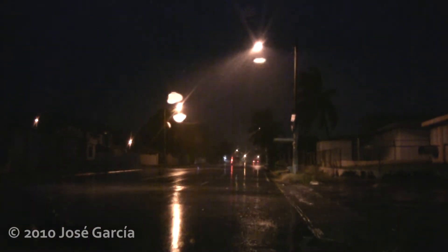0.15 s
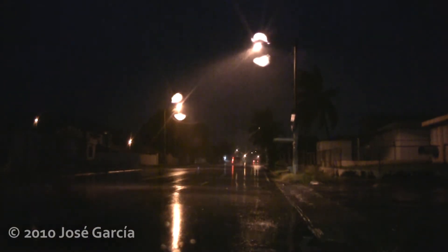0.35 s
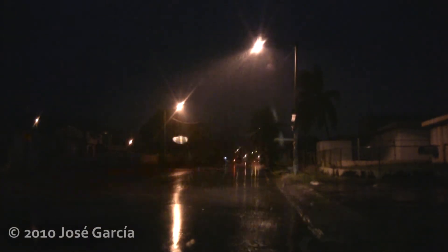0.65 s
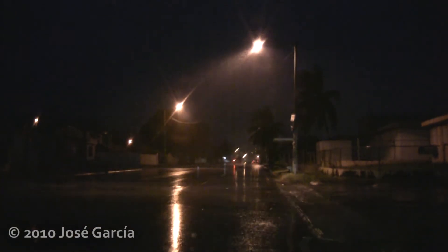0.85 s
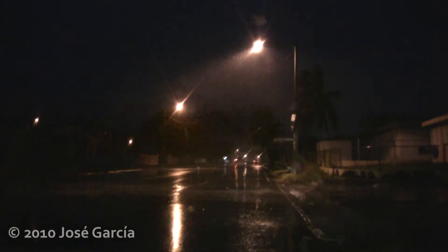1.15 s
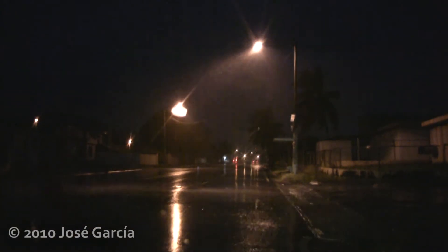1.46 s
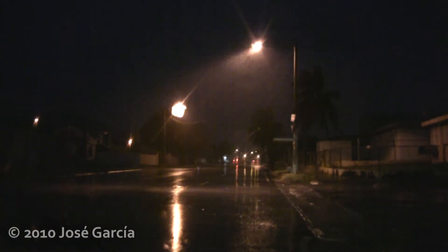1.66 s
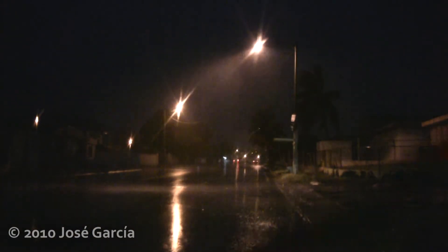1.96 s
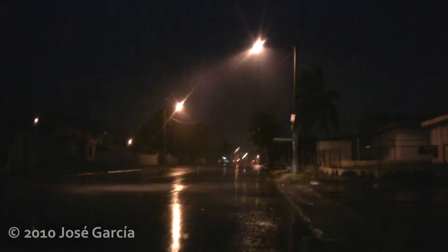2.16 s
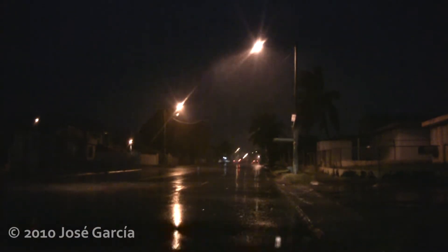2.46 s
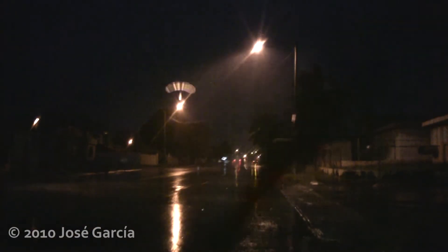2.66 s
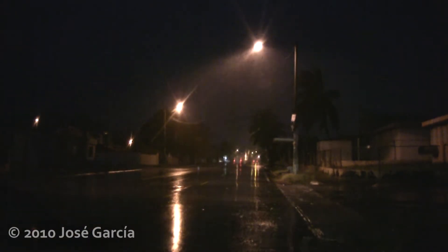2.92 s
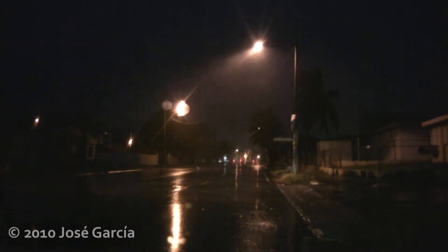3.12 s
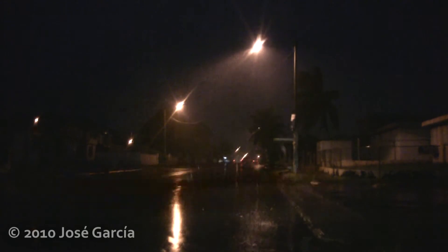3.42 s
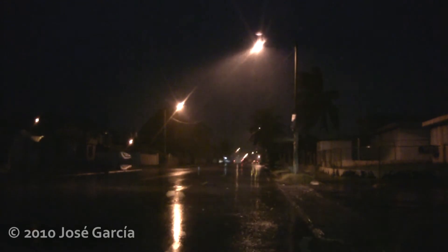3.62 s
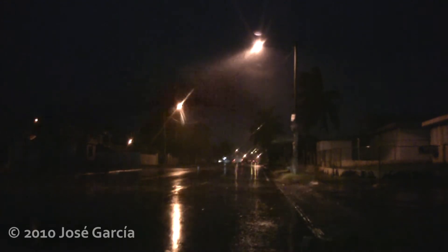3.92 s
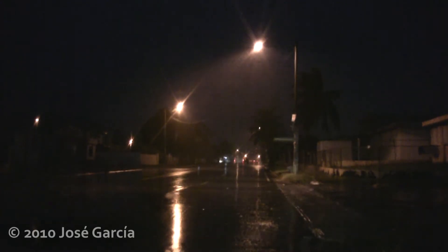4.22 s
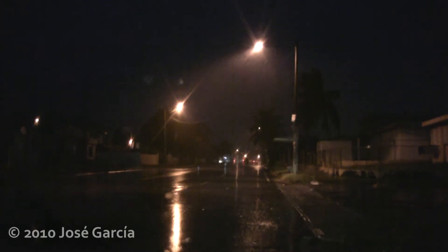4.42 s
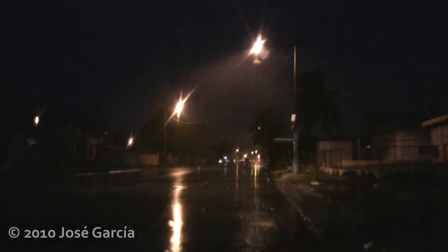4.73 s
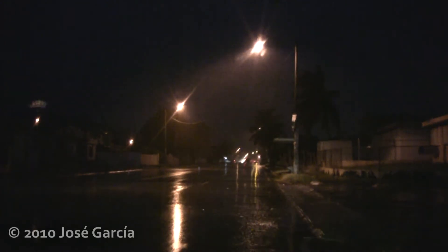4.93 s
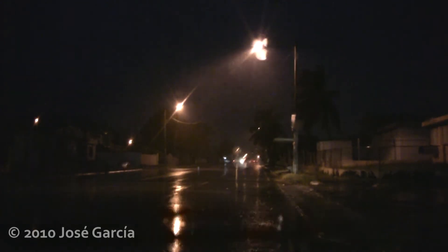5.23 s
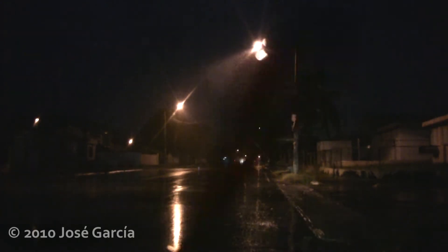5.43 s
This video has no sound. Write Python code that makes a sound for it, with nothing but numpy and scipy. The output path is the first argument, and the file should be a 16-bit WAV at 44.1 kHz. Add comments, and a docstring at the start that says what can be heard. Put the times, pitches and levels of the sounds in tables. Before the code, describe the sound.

Close stereo sound from a dashboard: a throbbing idle and low roof rain lie under wiper slaps every 0.7 seconds, alternating booming and lighter. After the first slaps, plastic catches rattle, the washer motor whirs and water sprays and pounds on the windscreen, then the stalk clacks back. Scattered splats and dry ticks continue, with rain slightly stronger later. Small, dry cabin; the loudest impacts distort.

```python
"""Wipers and rain inside a parked car

Stereo microphone on the dashboard, a little nearer its left port; input peaks above full scale clip.
Two wiper blades slap at each end of a fast sweep: damped modes of glass and cowl under noise cracks.
Behind them an idling engine sums wavering orders and firing knocks; rain is noise shaped by random drops.
Splats and dry ticks on the body are decaying noise bursts.
The washer stalk clacks, its pump hums in harmonics, its water hisses.
"""
import sys
import numpy as np
from scipy import signal
from scipy.fft import rfft, irfft, next_fast_len
from scipy.io import wavfile
from scipy.ndimage import map_coordinates

SR = 44100
rng = np.random.default_rng(int(sys.argv[2]) if len(sys.argv) > 2 else 0)


def master(y):
    """Save y as 16-bit WAV."""
    cut = np.clip(np.atleast_2d(y).T, -1, 1)
    pcm = np.round(cut * 32767)  # scale
    wavfile.write(sys.argv[1], SR, pcm.astype(np.int16))


def to_linear_factor(level_db):
    """Convert decibel levels (scalar or array-like) to linear amplitude factors."""
    exponent = np.asarray(level_db, float) / 20
    return 10 ** exponent


N = 246078

# How hard it rains. Each row: time in seconds, strength in dB.
RAIN_STRENGTH = [(0.0, -47), (.8, -45), (1.1, -44), (1.48, -44.5), (2.0, -39.5), (2.36, -41.5),
                 (2.75, -40.5), (3.25, -43.5), (3.56, -38.5), (3.8, -43.5), (4.1, -41.5), (4.6, -38.5),
                 (5.14, -41), (5.58, -39.5)]
# Spectrum of drops on the roof. Each row: frequency in Hz, relative level in dB per Hz.
ROOF_SPECTRUM = [(32, -40), (55, -4), (102, -5.5), (134, 1), (293, -6), (390, -11.5), (438, -5), (484, -14),
                 (544, -9), (654, -17), (899, -17.5), (1260, -25), (3000, -38.5), (3900, -51), (6600, -120)]
# Spectrum of fine spray on the glass. Each row: frequency in Hz, relative level in dB per Hz.
SPRAY_SPECTRUM = [(710, -18), (1200, -3), (1840, -4.5), (2010, -2.5), (4410, -5), (5360, -10.5),
                  (9410, -13.5), (10900, -18.5), (12200, -22.5), (15900, -51), (22000, -120)]
# Spectrum of washer water on the glass. Each row: frequency in Hz, relative level in dB per Hz.
WATER_SPECTRUM = [(880, -27), (1500, -11), (2170, -11), (2770, -4), (3140, -5), (3360, -7), (6280, -8),
                  (12200, -16.5), (15900, -47), (22000, -120)]
# Likeness of the rain at the left and right ports. Each row: frequency in Hz, correlation from 0 to 1.
PORT_LIKENESS = [(60, .98), (500, .93), (2000, .82), (4000, .5), (8000, .35), (12000, .35)]
# Spurts of hiss on the glass: washer water, and a brief hiss with the slap at 1.70 s. Each row: start of full
# strength in seconds, seconds per 20 dB of rise, hold in seconds, seconds per 20 dB of fall, hiss level in dB.
WATER_SPURTS = [(1.593, 0.011, 0.0086, 0.13, -34), (1.695, 0.058, .006, .015, -35),
                (1.848, 0.55, 0.28, .08, -34), (2.253, 0.017, 0.057, 0.017, -33)]
# Engine idle. Each row: time in seconds, firing rate in Hz.
IDLE_RATE = [(0, 21.6), (1.7, 21.6), (1.9, 21.46), (3.3, 21.47), (3.6, 21.53), (5.0, 21.52), (5.58, 21.42)]
# Engine orders. Each row: multiple of the firing rate, relative level in dB.
ENGINE_ORDERS = [(1, 3), (2, -0.5), (3, -30), (4, -13), (4.5, -2), (6, 3.5), (8, -40), (9, -9), (10, -0.5),
                 (11, -14), (12, -7)]
# Body resonances struck by each firing. Each row: frequency in Hz, width in Hz, relative level in dB.
FIRING_RESONANCES = [(367, 19.5, 5.5), (451, 54, 2), (571, 34, 3), (770, 66, -9.5), (924, 26, 2)]
# Faint narrow bands of steady noise near 10.4 to 11 kHz. Each row: frequency in Hz, width in Hz,
# relative level in dB.
NARROW_HISS_BANDS = [(10400, 40, 6), (10790, 37, 8), (11040, 47, 10)]
# Washer pump harmonics. Each row: multiple of the pump speed, rms level in dB.
PUMP_HARMONICS = [(1, -29), (2, -29.5), (3, -32.5), (4, -30), (5, -36), (6, -46.5), (7, -41)]
# Splats and dry ticks on the body. Each row: start in seconds, thump in dB, burst in dB, fine hiss in dB.
BODY_HITS = [(0.093, -29, -30, -56), (0.436, -27, -27, -41), (1.008, -12, -39, -51),
             (1.1778, -24, -23.5, -34), (1.219, -12.5, -46, -56), (1.2368, -10, -21.5, -27),
             (2.005, -15, -38, -39), (2.235, -11, -42, -47), (2.281, -10.5, -28, -39),
             (2.582, -16, -31, -51), (2.8608, -14, -26.5, -49), (3.94, -33, -23, -68),
             (4.3521, -14.5, -17, -49), (5.05, -26, -47, -31), (5.092, -28, -43, -33),
             (5.3526, -20, -19.5, -29), (5.448, -15.5, -51, -50)]
# Body panels under a hit. Each row: frequency in Hz, width in Hz, relative level in dB.
PANEL_RESONANCES = [(312, 81, 10.5), (540, 175, 8), (856, 220, 4), (1360, 116, -2.5), (1810, 440, -13.5)]
# The washer stalk is pulled, then let go. Each row: start in seconds, thump in dB, clack in dB,
# rattle in dB, pitch of the hollow knock in Hz.
STALK_HITS = [(1.414, -6.5, -23, -27, 513), (1.4331, -4.5, -14, -19.5, 932), (1.467, -11.5, -27, -39, 598),
              (1.482, -3.5, -21, -40, 1270), (1.5078, -12, -46, -41, 300), (1.522, -12.5, -19.5, -29, 590),
              (2.106, -9, -24, -31, 872), (2.15, -10.5, -35, -39, 566), (2.1748, -3.5, -31, -39, 798)]
# Decay of the cabin. Each row: frequency in Hz, t60 in seconds.
CABIN_DECAY = [(150, 0.061), (1000, 0.033), (8000, 0.04)]
# Slaps at the low end of the sweep. Each row: start in seconds, knock in dB, crack in dB,
# lead-in tick in seconds before, rebound in seconds after.
LOW_SLAPS = [(0.3288, 3, -17.5, 0.011, 0.023), (1.7004, 2, -14.5, .0156, .024),
             (3.0797, 2.5, -19, 0.011, .0302), (4.455, 1, -14, 0.013, .0165)]
# Slaps at the high end of the sweep. Each row: start in seconds, knock in dB, crack in dB,
# second tap in seconds before, first tap in seconds before.
HIGH_SLAPS = [(1.033, -8, -26, .0185, 0.04), (2.4068, -4.5, -21.5, .0218, .0423),
              (3.7832, -2.5, -21, .0123, .0295), (5.158, -2.5, -21.5, .0215, 0.036)]
# Glass and cowl at the low end. Each row: frequency in Hz, relative level in dB, t60 before damping in seconds.
LOW_MODES = [(142.7, -5.5, 0.12), (188.6, 3, 0.16), (283, -3, 0.3), (331, -0.5, 0.12), (434, -11, 0.17),
             (651, -7, 0.036)]
# Glass and cowl at the high end. Each row: frequency in Hz, relative level in dB, t60 before damping in seconds.
HIGH_MODES = [(139, 5, 0.069), (169, 3, .13), (231.6, 4, 0.076), (365.7, 5, 0.073), (511, -5.5, 0.079),
              (757, -0.5, 0.052), (936, -3.5, 0.054)]
# Linkage taking up slack. Each row: frequency in Hz, relative level in dB, t60 before damping in seconds.
SLACK_MODES = [(210.4, 8.5, 0.055), (428, 6, 0.031), (643, -1.5, 0.083), (764, -3, 0.07)]
# Metal frame of the blade. Each row: frequency in Hz, relative level in dB, t60 in seconds.
FRAME_MODES = [(1392, 3.5, 0.058), (1806, 11.5, 0.018), (1840, -18, 0.01), (2690, -4, 0.078),
               (3450, -28, 0.012)]
# The two microphone ports. Each row: frequency in Hz, phase lead of the left in radians.
PORT_PHASE = [(20, 0), (2000, .05), (4500, .7), (8000, 1.5), (11000, 2.0)]

ROOF_DB, ROOF_SWING, SPRAY_OVER_DB = -21.5, 0.29, 1.33  # at mean strength; dB per dB; over the strength
STRAIN_DB, STRAIN_S = 4.5, 0.07  # the body booms more while the blades turn round
POUND_DB = 4.5  # washer water also drums on the glass, over its hiss
PUMP_ON_S, PUMP_OFF_S, PUMP_RAMP_S, PUMP_HZ = 1.56, 2.12, 0.03, 126
HIT_T60_S, LONGER_PER_DB = 0.086, 0.06  # at a thump of 0 dB; heavier lasts longer
HOLLOW_DB, HOLLOW_T60_S, COLUMN_HZ, COLUMN_DB = -2, 0.071, 162, -5  # levels relative to the thump
# (knock, crack) relative to the slap, in dB
LEAD_DB, REBOUND_DB, SETTLE_DB = (-18, -6.5), (-10, -7.5), (-15.5, -45)
SECOND_TAP_DB, FIRST_TAP_DB = (-11, 3), (-13.5, -6)
SETTLE_S = 0.02  # after the rebound
LOW_SLACK, HIGH_SLACK = (0.098, -17, -61), (0.1275, -14, -39)  # (s ahead of the slap, knock dB, crack dB)


def unit(x):
    """Scales a signal to rms 1."""
    return x / np.sqrt(np.mean(x ** 2) + 1e-20)


def along(points, hz):
    """Interpolates (Hz, value) points on a log frequency axis."""
    f, v = np.transpose(points)
    return np.interp(np.log(hz + 1), np.log(f + 1), v)


def curve(rows):
    """Interpolates (seconds, value) rows to one value per sample."""
    s, value = np.transpose(rows)
    return np.interp(np.arange(N) / SR, s, value)


def wobble(rate):
    """A smooth random curve with rate knots a second."""
    knots = rng.standard_normal(int(N * rate / SR) + 4)
    return map_coordinates(knots, [np.arange(N) * rate / SR])


def filtered(x, response):
    """Multiplies the spectrum of x by a complex response of frequency."""
    m = next_fast_len(N + SR // 2)
    return irfft(rfft(x, m) * response(np.fft.rfftfreq(m, 1 / SR)), m)[..., :N]


def resonances(peaks):
    """Causal response of parallel (Hz, width, dB) resonances of alternating sign."""
    def response(f):
        total = 0
        for k, (centre, width, db) in enumerate(peaks):
            damping = 1j * f * width
            total = total + (-1) ** k * to_linear_factor(db) * damping / (centre * centre - f * f + damping)
        return total
    return response


def band(lo_hz, hi_hz):
    """A causal band-pass."""
    sos = signal.butter(3, [lo_hz, hi_hz], "bandpass", fs=SR, output="sos")
    return lambda x: signal.sosfilt(sos, x)


def ring(modes, t):
    """Decaying modes, their strengths scattered anew for each blow."""
    scatter_db = 1.2
    return sum(to_linear_factor(db + rng.normal(0, scatter_db) - 60 * t / t60) * np.sin(2 * np.pi * hz * t)
               for hz, db, t60 in modes)


def burst(times, level_db, t60, rise_s, colour):
    """Coloured noise under a sharp rise and a decay; its energy follows from level and decay."""
    out, t = np.zeros(N + SR), np.arange(SR // 4) / SR
    for s, db, fall in zip(times, level_db, np.broadcast_to(t60, len(times))):
        shape = to_linear_factor(-60 * t / fall) * (1 - np.exp(-t / rise_s))
        puff = colour(shape * rng.choice([-1, 1], len(t)))
        out[round(s * SR):][:len(t)] += to_linear_factor(db) * unit(puff) * np.sqrt(np.mean(shape ** 2))
    return out[:N]


def patter(spectrum, per_s, spread_db, t60, share):
    """Stereo rain of rms 1: short noise bursts, one a drop, over a smooth wash."""
    drops = (rng.random(N) < per_s / SR) * to_linear_factor(spread_db * rng.uniform(-0.66, 1, N))
    decay = to_linear_factor(-60 * np.arange(4096) / SR / t60)
    beat = np.abs(signal.fftconvolve(drops, decay)[:N])
    pair = rng.standard_normal((2, N)) * (share * unit(beat) + 1 - share)

    def mid_side(hz):
        # this angle gives the ports their correlation
        angle = np.arccos(np.clip(along(PORT_LIKENESS, hz), -1, 1)) / 2
        return to_linear_factor(along(spectrum, hz)) * [np.cos(angle), np.sin(angle)]

    mid, side = filtered(pair, mid_side)
    return unit(np.array([mid + side, mid - side]))


def rain():
    """Drops drum low on the roof; fine spray and the washer water hiss on the glass."""
    rain_db, t = curve(RAIN_STRENGTH), np.arange(N) / SR
    water = 0
    for s, rise, hold, fall, db in WATER_SPURTS:
        slope = np.minimum((t - s) / rise, (s + hold - t) / fall)
        water = water + to_linear_factor(db + 20 * np.minimum(0, slope))
    strain = sum(np.exp(-((t - slap[0]) / STRAIN_S) ** 2) for slap in LOW_SLAPS + HIGH_SLAPS)
    roof_db = ROOF_DB + ROOF_SWING * (rain_db - rain_db.mean()) + STRAIN_DB * strain
    drum_level = to_linear_factor(roof_db) + to_linear_factor(POUND_DB) * water
    drum = drum_level * patter(ROOF_SPECTRUM, 300, spread_db=1.0, t60=0.033, share=0.23)
    spray_level = to_linear_factor(rain_db + SPRAY_OVER_DB)
    spray = spray_level * patter(SPRAY_SPECTRUM, 390, spread_db=30, t60=0.0034, share=0.14)
    hiss_level = water * to_linear_factor(0.81 * wobble(39.93))
    hiss = hiss_level * patter(WATER_SPECTRUM, 1300, spread_db=7, t60=0.014, share=0.23)
    return drum, spray + hiss


def narrow_hiss():
    """Faint narrow bands of steady noise near 10.4 to 11 kHz, each port its own."""
    noise = rng.standard_normal((2, N))
    return to_linear_factor(-57.0) * unit(filtered(noise, resonances(NARROW_HISS_BANDS)))


def engine(drum):
    """Low orders hum; each firing knocks the body and shakes the panels, so the rain's drumming throbs."""
    cycles = np.cumsum(curve(IDLE_RATE)) / SR + 0.55
    turn = 2 * np.pi * cycles
    hum = sum(to_linear_factor(db + 0.29 * wobble(3.9)) * np.sin(k * turn + 0.3794 * k * k)
              for k, db in ENGINE_ORDERS)
    # one impulse per firing, of uneven strength
    fires = np.diff(np.floor(cycles + 0.2), prepend=0) * to_linear_factor(3.5 * wobble(30))
    knock = unit(filtered(fires, resonances(FIRING_RESONANCES)))
    throb = to_linear_factor(0.32 * np.cos(turn + 0.3))
    return to_linear_factor(-31.5) * hum + to_linear_factor(-31.5) * knock + throb * drum


def pump():
    """A small motor hums in harmonics, a little unsteady, while the stalk is held."""
    t = np.arange(N) / SR
    on = np.clip(np.minimum(t - PUMP_ON_S, PUMP_OFF_S - t) / PUMP_RAMP_S, 0, 1)
    turn = 2 * np.pi * np.cumsum(PUMP_HZ * (1 + 0.004 * wobble(12))) / SR
    hum = sum(to_linear_factor(db + 1.8 * wobble(12)) * np.sin(k * turn + k * k) for k, db in PUMP_HARMONICS)
    return on * np.sqrt(2) * hum  # a sine of peak sqrt(2) has rms 1


def body_hits(rows):
    """Each blow rattles the panels under a treble burst and a fine hiss."""
    s, low_db, treble_db, hiss_db = np.transpose(rows)[:4]
    t60 = HIT_T60_S * np.exp(LONGER_PER_DB * low_db)

    def panel(x):
        return irfft(rfft(x) * resonances(PANEL_RESONANCES)(np.fft.rfftfreq(len(x), 1 / SR)), len(x))

    # the panels ring on a little after the blow
    low = burst(s, low_db, 1.48 * t60, 0.0013, panel)
    treble = burst(s, treble_db, t60, 0.000082, band(1060, 3840))
    hiss = burst(s, hiss_db, t60, 0.00016, band(3600, 10300))
    return low + treble + hiss


def stalk():
    """Plastic catches rattle the dashboard, each a hollow knock over the boom of the steering column."""
    out, t = np.zeros(N + SR), np.arange(SR // 4) / SR
    for s, thump_db, _, _, hz in STALK_HITS:
        modes = [(hz, HOLLOW_DB, HOLLOW_T60_S), (COLUMN_HZ, COLUMN_DB, 0.1)]
        out[round(s * SR):][:len(t)] += to_linear_factor(thump_db) * ring(modes, t) * (1 - np.exp(-t / 0.0013))
    return out[:N] + body_hits(STALK_HITS)


def cabin(x):
    """The short answer of the cabin: a noise tail, each frequency dying at its own speed."""
    hz, t, z = signal.stft(rng.standard_normal((2, SR // 4)), SR, nperseg=256)
    z = np.where(hz[:, None] < 400, z[0], z)  # the bass is alike at both ports
    tail = signal.istft(z * to_linear_factor(-60 * t / along(CABIN_DECAY, hz)[:, None]), SR, nperseg=256)[1]
    tail = tail / np.linalg.norm(tail[0])
    late = np.pad(x, (130, 0))[None]  # delayed by 130 samples, 3 ms
    return signal.fftconvolve(late, tail, axes=1)[:, :N]


def thuds(contacts, modes, damp_s):
    """Rubber slaps glass: a ring smothered as the blade settles, a clack, a short crack and a thin snap."""
    out, t = np.zeros(N + SR), np.arange(SR // 3) / SR
    shape = (1 - np.exp(-t / 0.0027)) * (0.32 + 1.09 / (1 + (t / damp_s) ** 4))
    for s, knock_db, crack_db in contacts:
        knock = to_linear_factor(knock_db) * ring(modes, t) * shape
        # the frame's clack follows the level of the crack
        clack = 0.39 * to_linear_factor(crack_db) * ring(FRAME_MODES, t) * (1 - np.exp(-t / 0.001))
        out[round(s * SR):][:len(t)] -= knock + clack
    s, _, crack_db = np.transpose(contacts)
    snap = burst(s, crack_db - 10, 0.01, 0.0001, band(2900, 11400))
    crack = 0.95 * burst(s, crack_db, 0.066, 0.000068, band(560, 3020))
    return out[:N] + snap + crack


def wipers():
    """At each end the linkage takes up its slack, then a run of small contacts surrounds the slap."""
    low, high, slack = [], [], []

    def add(contacts, s, knock_db, crack_db, steps):
        for late, (knock, crack) in steps:
            contacts.append((s + late, knock_db + knock, crack_db + crack))

    for s, knock, crack, lead, back in LOW_SLAPS:
        add(low, s, knock, crack, [(-lead, LEAD_DB), (0, (0, 0)), (back, REBOUND_DB),
                                   (back + SETTLE_S, SETTLE_DB)])
    for s, knock, crack, second, first in HIGH_SLAPS:
        add(high, s, knock, crack, [(-first, FIRST_TAP_DB), (-second, SECOND_TAP_DB), (0, (0, 0))])
    for slaps, (ahead, knock, crack) in [(LOW_SLAPS, LOW_SLACK), (HIGH_SLAPS, HIGH_SLACK)]:
        slack += [(slap[0] - ahead, knock, crack) for slap in slaps]
    return thuds(low, LOW_MODES, 0.017) + thuds(high, HIGH_MODES, 0.024) + thuds(slack, SLACK_MODES, 0.021)


def scene():
    """All sources at the dashboard, a little nearer the left port."""
    drum, spray = rain()
    hits = wipers() + body_hits(BODY_HITS) + stalk()
    # the hits carry little deep bass
    hits = filtered(hits, lambda hz: (1j * hz / (70 + 1j * hz)) ** 2)
    mix = hits + to_linear_factor(-9.0) * cabin(hits) + engine(drum) + narrow_hiss() + pump() + spray
    return mix * to_linear_factor([[0.9], [-0.9]])


def top_cut(x):
    """Nothing passes above the cut-off."""
    return signal.sosfilt(signal.butter(12, 15000, fs=SR, output="sos"), x)


def record(dry):
    """The microphone ports differ in phase and roll off in the top octave; the input clips hard."""
    def ports(hz):
        phase = np.exp(0.5j * along(PORT_PHASE, hz) * [[1], [-1]])
        return phase / np.sqrt(1 + (hz / 12500) ** 12)

    heard = filtered(dry, ports) + 0.0041  # a small constant offset
    return top_cut(np.clip(heard, -1.0, 1.0))


dry = scene()
out = record(dry)
master(out)
```